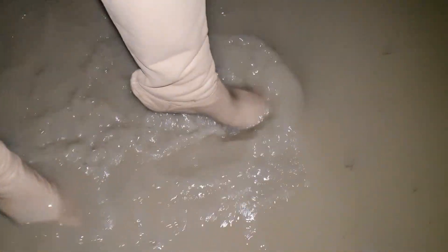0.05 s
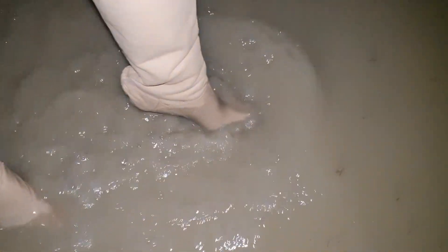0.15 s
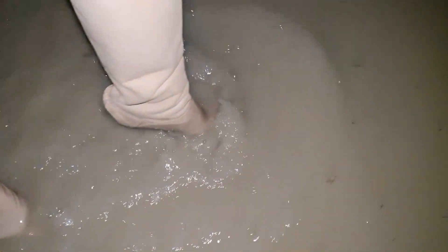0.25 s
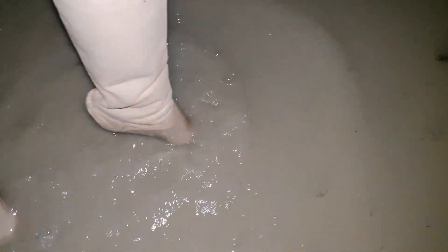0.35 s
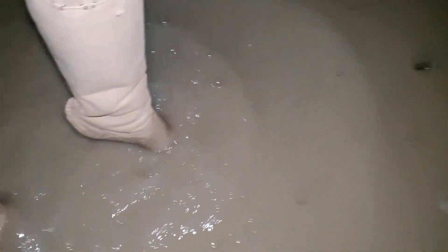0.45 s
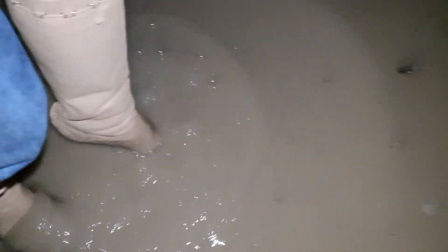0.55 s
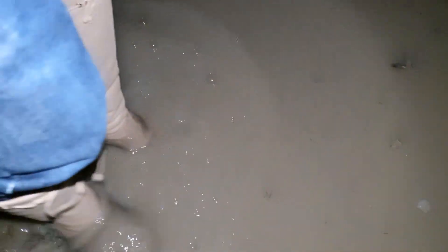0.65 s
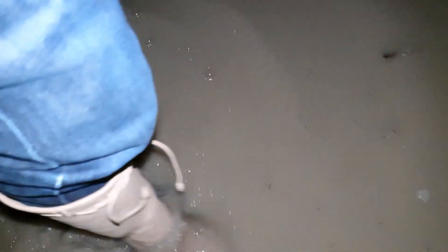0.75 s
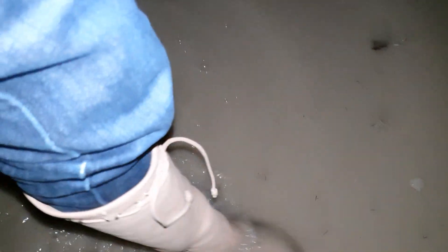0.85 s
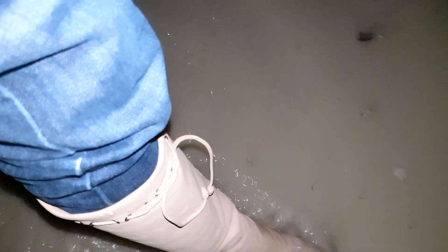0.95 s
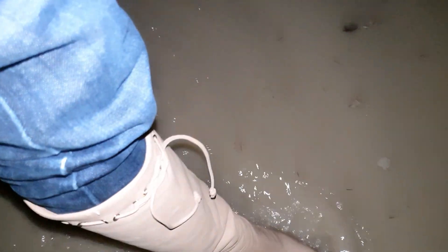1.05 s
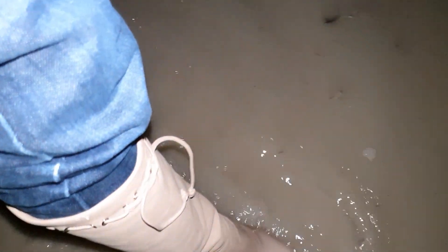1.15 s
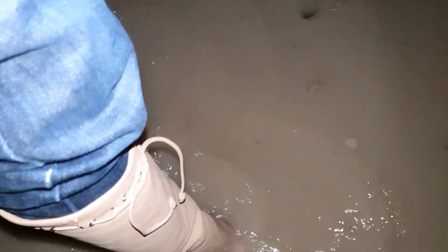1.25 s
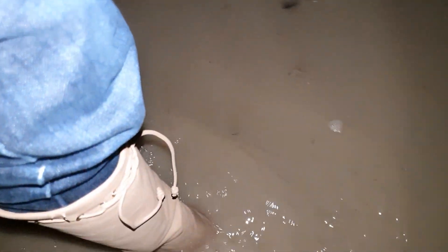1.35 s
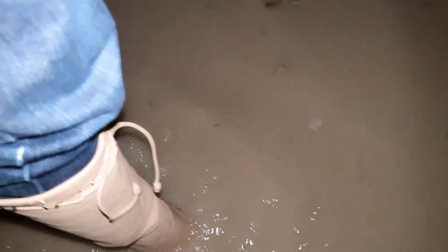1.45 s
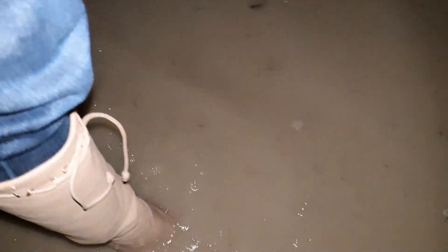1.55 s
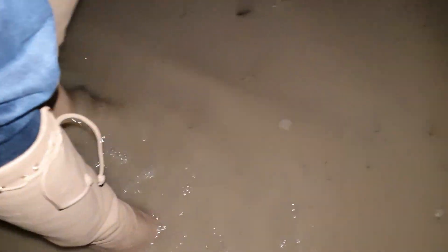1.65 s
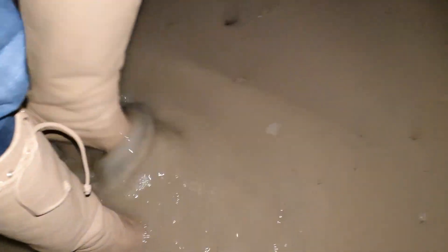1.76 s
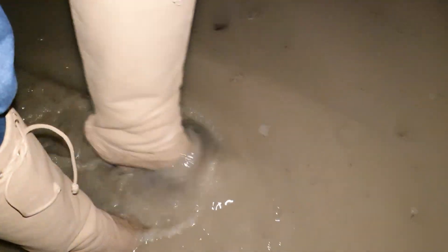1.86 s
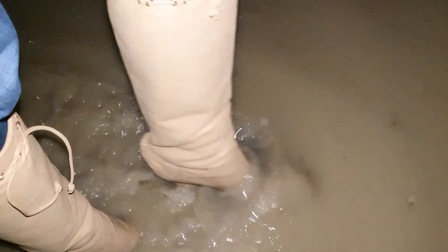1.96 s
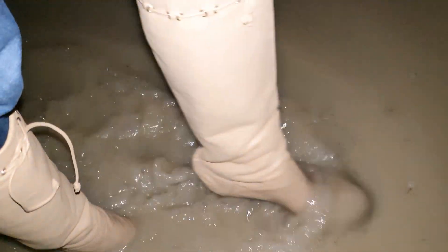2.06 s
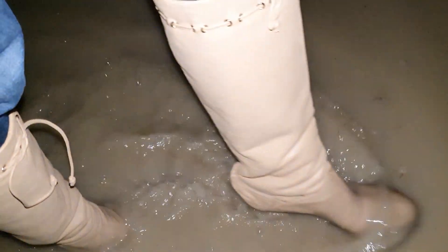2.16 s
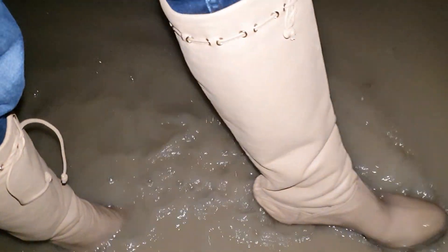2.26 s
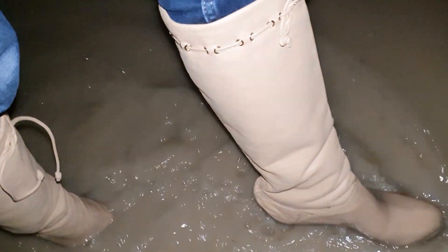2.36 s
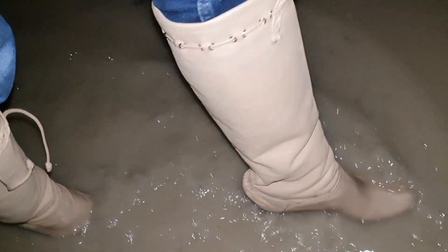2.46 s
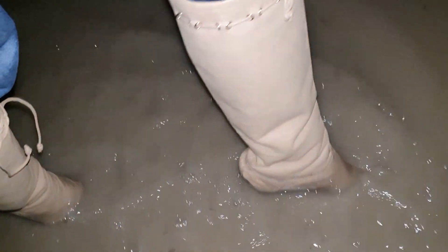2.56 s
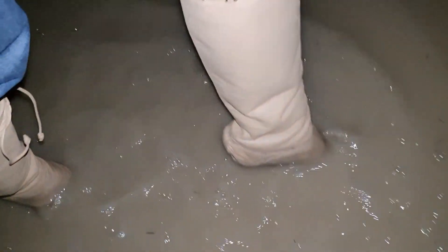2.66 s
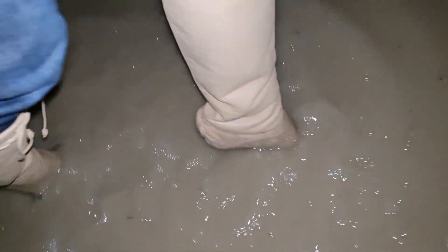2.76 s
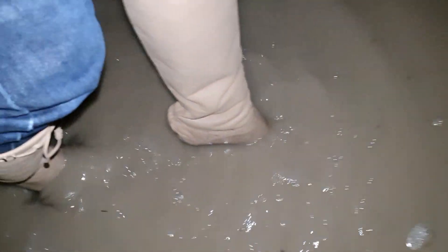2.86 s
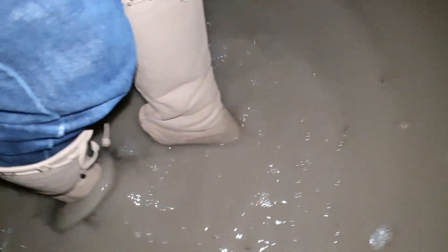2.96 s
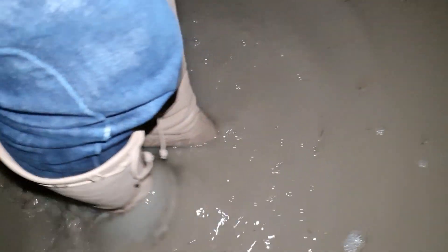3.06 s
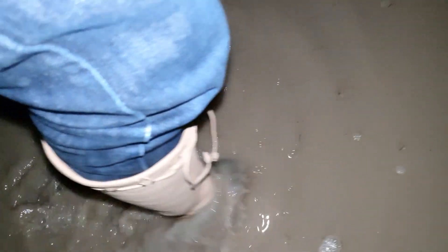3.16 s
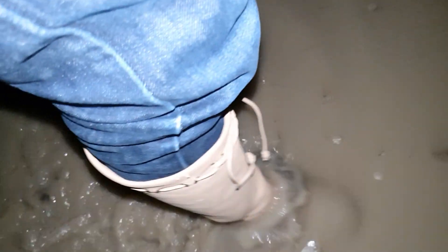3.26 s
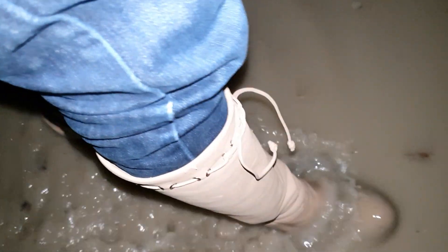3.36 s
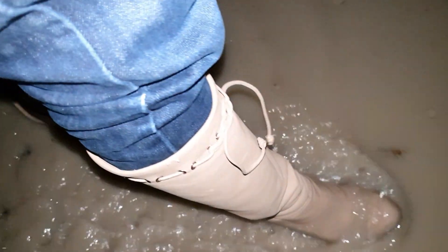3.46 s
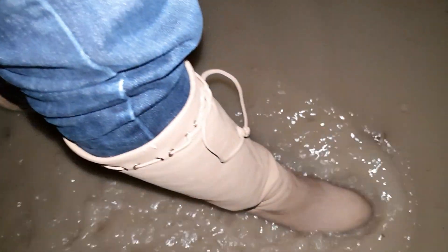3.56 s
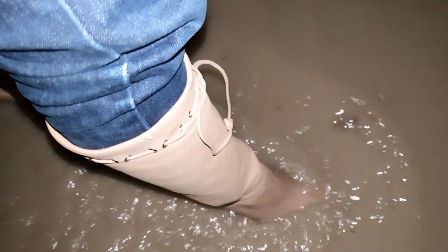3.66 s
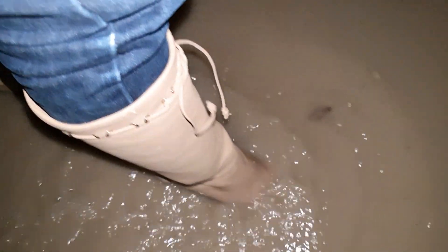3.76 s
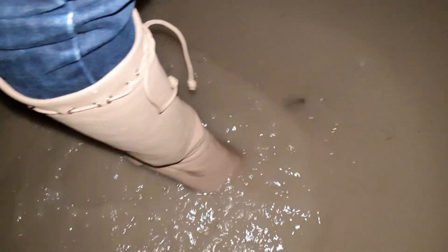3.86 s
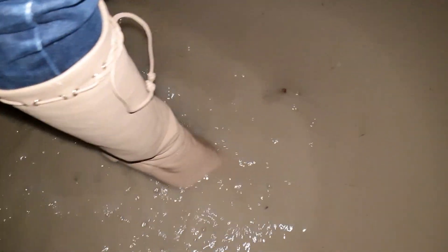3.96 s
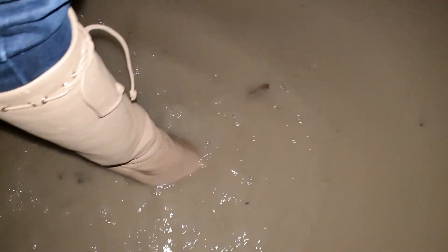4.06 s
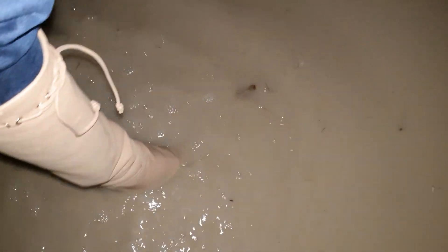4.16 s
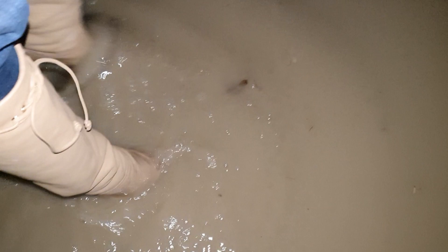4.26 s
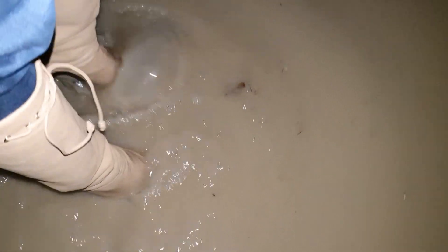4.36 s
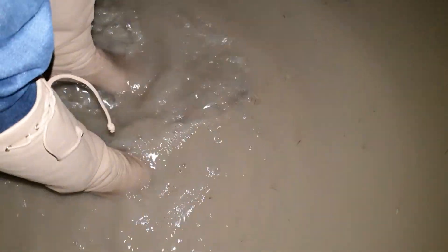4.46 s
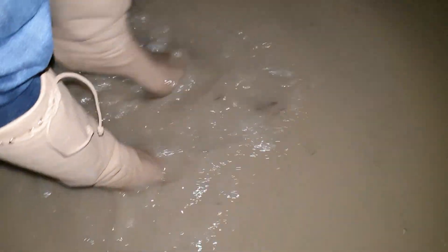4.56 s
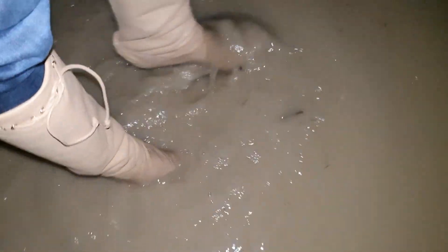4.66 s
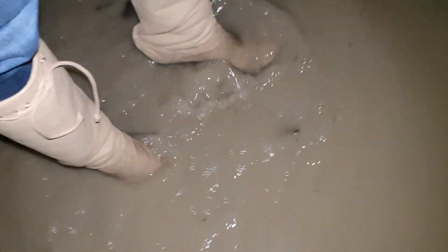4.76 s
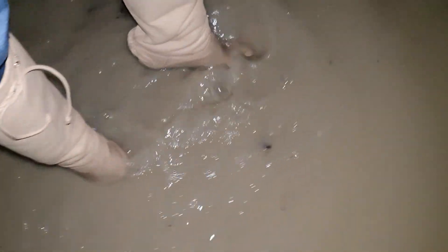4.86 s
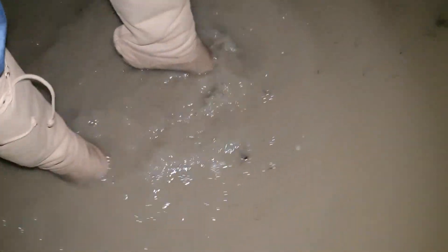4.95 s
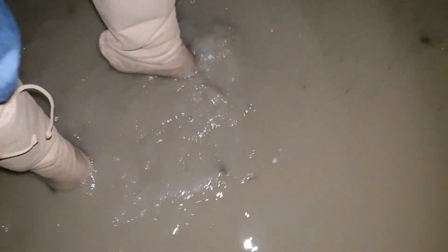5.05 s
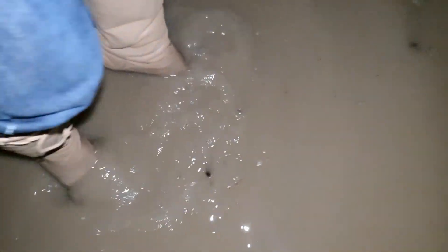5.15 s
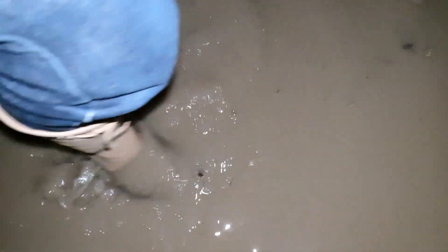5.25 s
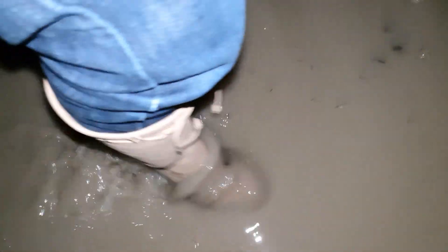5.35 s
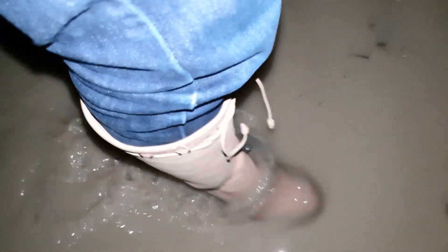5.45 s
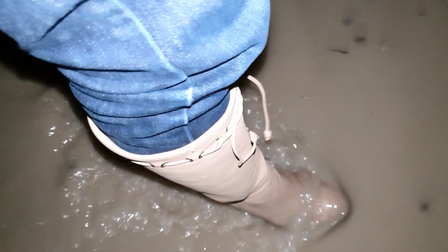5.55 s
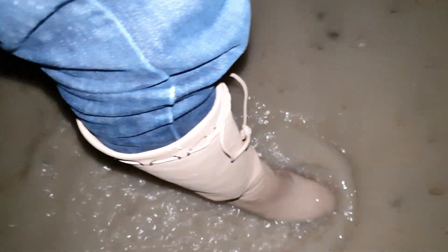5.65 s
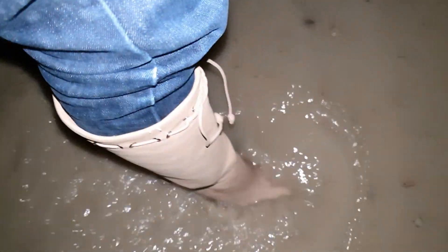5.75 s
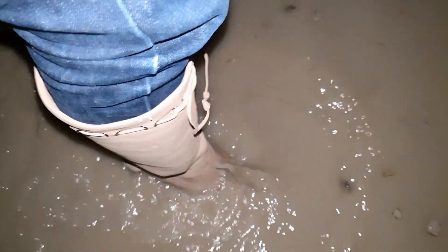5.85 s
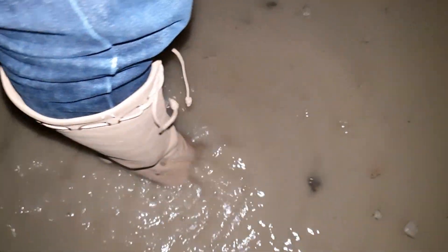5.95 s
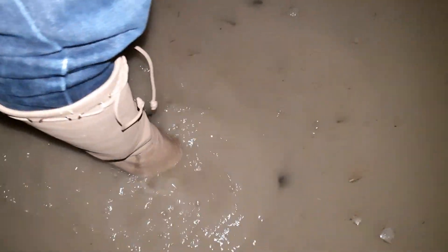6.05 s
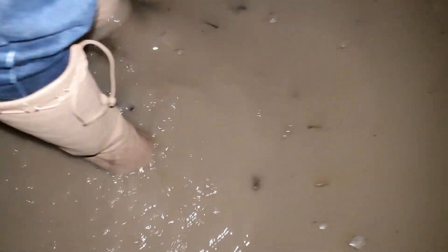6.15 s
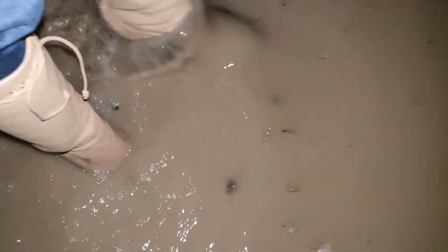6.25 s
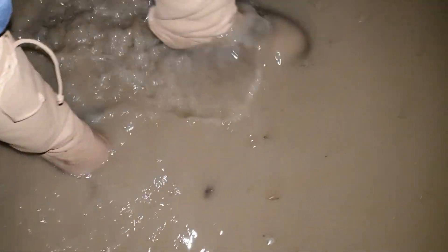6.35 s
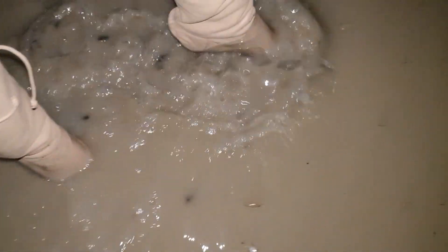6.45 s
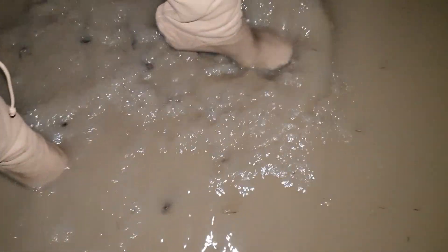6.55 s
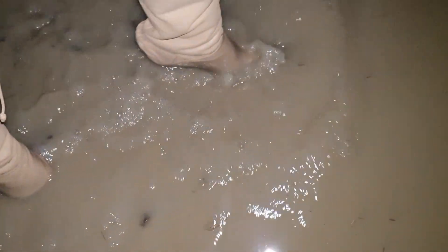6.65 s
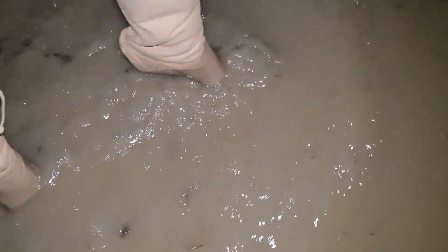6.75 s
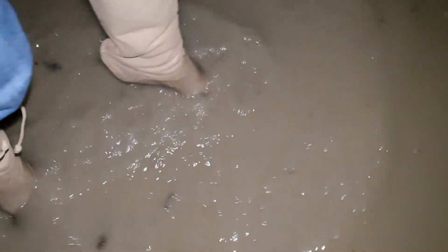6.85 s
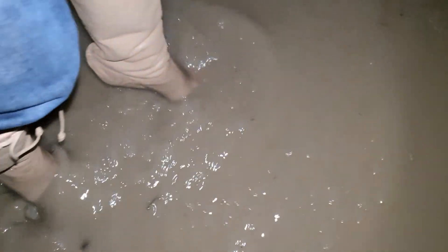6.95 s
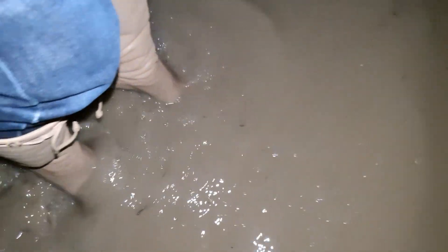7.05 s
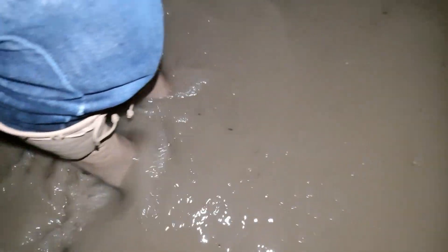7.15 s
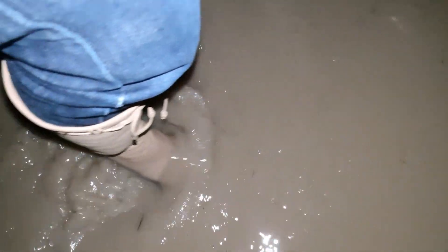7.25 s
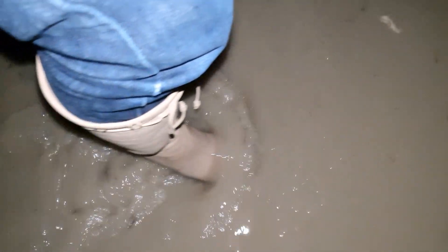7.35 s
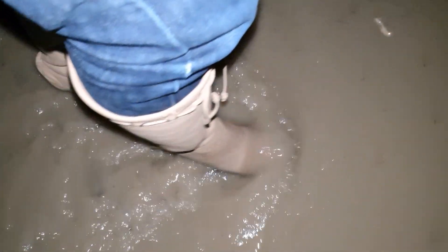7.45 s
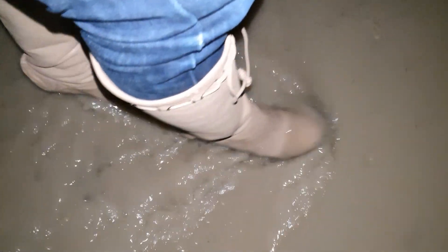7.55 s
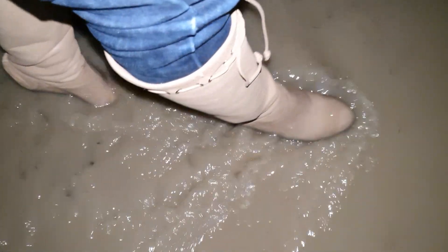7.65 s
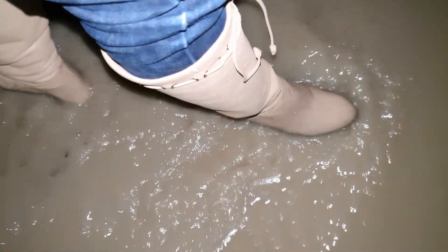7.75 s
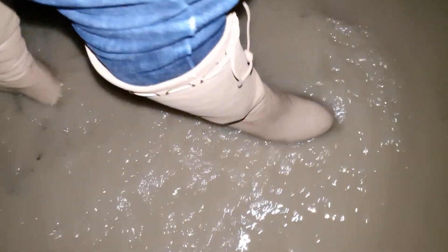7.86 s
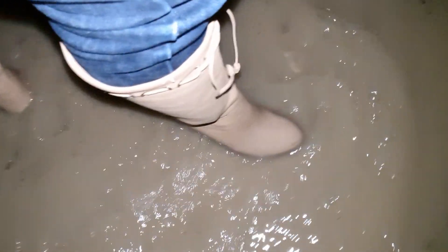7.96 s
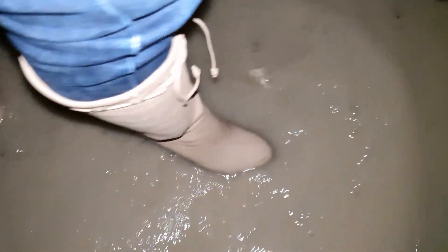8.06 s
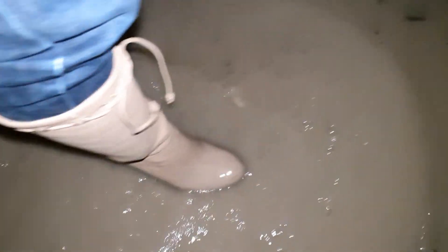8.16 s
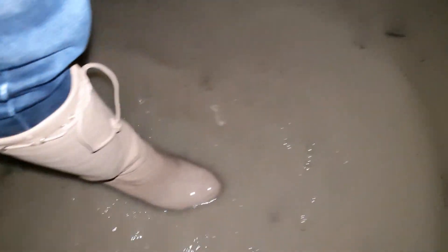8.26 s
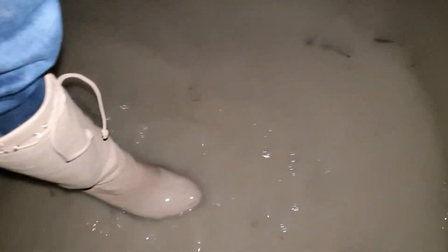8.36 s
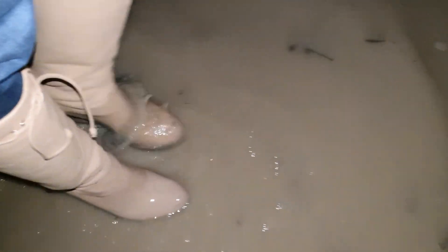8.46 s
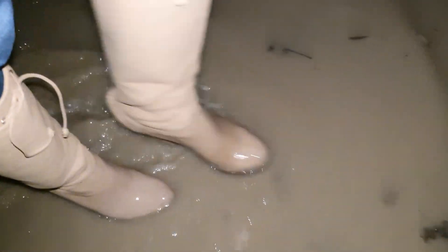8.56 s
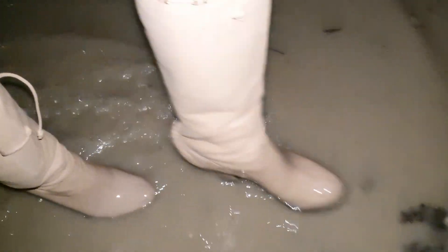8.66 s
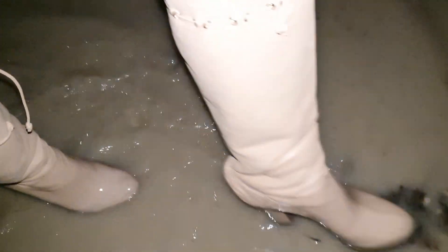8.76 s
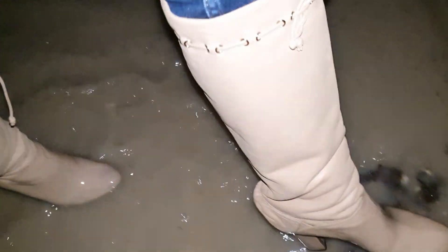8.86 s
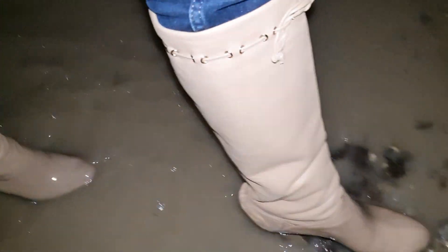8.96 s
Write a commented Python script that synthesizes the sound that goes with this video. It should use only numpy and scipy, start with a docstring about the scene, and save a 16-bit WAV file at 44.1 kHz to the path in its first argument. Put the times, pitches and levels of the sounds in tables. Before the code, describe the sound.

Boots wade through shallow muddy water, close and in stereo, outdoors. A brief splash opens, then a dull double thud at 0.4 s. A full bubbling slosh swells from 0.6 to 1.1 s with a sharp plop near 0.9, followed by small gurgles. Another softer surge peaks at 2 s and trickles off. At 3 to 3.5 s a long, rich churn rings with bubbles and spray. After a lull, a firm wet heel knock lands at 4.3 s, with a smaller thud and slosh at 4.7 to 5. Bright splashing fills 5.3 to 5.7 s, a thud follows at 5.8, and a strong gurgling surge bursts at 6.2 to 6.5. From 7 s the steps are gentle, with light swishes, a low plop at 7.8 and trickles near 8.5, ending on a soft thud at 9 s. Faint low distant rumble and hiss continue throughout.

```python
"""Heeled boots wade slowly through a shallow muddy puddle.
Each stride churns up a swarm of ringing bubbles, ticking spray and a fine noise fizz, in surges that swell and fall.
Single air pockets ring with gliding pitch, heels and soles thud into the mud, and droplets tick one by one.
Shaped noise makes a distant low rumble, steady air and microphone hiss underneath."""
import sys
import numpy as np
from scipy import signal
from scipy.fft import rfft, irfft, next_fast_len
from scipy.io import wavfile
from scipy.ndimage import uniform_filter1d

SR = 44100
rng = np.random.default_rng(int(sys.argv[2]) if len(sys.argv) > 2 else 0)


def put_to_file(sound):
    """Save the sound as 16-bit audio at rate SR, in the file named by the first command-line argument."""
    columns = np.atleast_2d(sound).T  # one column per channel
    safe = np.clip(columns, -1, 1)
    whole_steps = np.round(safe * 32767)
    wavfile.write(sys.argv[1], SR, whole_steps.astype(np.int16))


N = 397341  # length in samples

PORTS = np.array([[.5], [-.5]])  # left and right microphone port take half of each difference
PORT_S, PORT_DB = .0001, 4.5  # spread of arrival time (s) and level (dB) between the ports
LEAD = 20  # samples of room before an onset, for the port that hears it first


def gain_of(db):
    """Decibels to linear gain."""
    return 10 ** (np.asarray(db) / 20)


def evened(x):
    """Scale to an overall RMS of one."""
    return x / np.sqrt(np.mean(x ** 2) + 1e-20)


def read(points, hz):
    """Read a spectrum curve in dB, straight between its points on a log frequency axis."""
    f, value = np.transpose(points)
    return np.interp(np.log(hz + 1), np.log(f + 1), value)


def curve(points):
    """Draw a level curve over the whole scene from (time, value) points."""
    s, value = np.transpose(points)
    return np.interp(np.arange(N) / SR, s, value)


def coloured(x, db_of):
    """Filter by a spectrum given as a function from Hz to dB."""
    size = next_fast_len(N + 4096)
    gain = gain_of(db_of(np.fft.rfftfreq(size, 1 / SR)))
    return irfft(rfft(x, size) * gain, size)[..., :N]


def add(mix, s, sound):
    """Lay a sound into the mix, starting LEAD samples ahead of s."""
    part = mix[:, max(round(s * SR) - LEAD, 0):][:, :sound.shape[1]]
    part += sound[:, :part.shape[1]]


def churn():
    """The boot drags air under: a crowd of bubbles, and spray of brief ticks over a fine fizz."""
    # bubble spectrum: pitch_hz, level_db
    bubble_sizes = [(280, -14.5), (450, 1.5), (800, 6), (1500, 6), (2500, 0), (4500, -11.5)]
    # spray spectrum: pitch_hz, level_db
    spray_sizes = [(1600, -3.5), (3200, 0.5), (6000, -4), (10000, -1.5), (15000, -1)]
    # slops of water share their timing
    slops = evened(uniform_filter1d(uniform_filter1d(rng.standard_normal(N), 400), 300))
    (bubbling_db, spray_db), (bubble_lean, spray_lean) = stirring()

    # gentle stirring leaves fewer plops, a stride a tangle
    per_s = 1100 * gain_of(.15 * (bubbling_db + 40.5))
    bubbles = swarm(bubble_sizes, per_s, spread_db=3.08, few=3.72, many=19.0, rise=0.222,
                    surge_db=3.28 * slops, lean=bubble_lean, count=64)
    spray = swarm(spray_sizes, 3400, spread_db=3.96, few=1.02, many=16.2, rise=0.22,
                  surge_db=2.67 * slops, lean=spray_lean, count=44)

    fizz_sizes = [(400, -19)] + spray_sizes
    fizz = evened(coloured(rng.standard_normal((2, N)), lambda hz: read(fizz_sizes, hz)))
    dull = signal.lfilter(*signal.butter(2, 7500, fs=SR), fizz)
    bright = fizz - dull
    # a lean to fine spray brightens the fizz
    fizz = dull * gain_of(-.4 * spray_lean) + bright * gain_of(1.4 * spray_lean)
    fizz = fizz * gain_of(2.5 * slops - 5.5)
    return gain_of(bubbling_db) * bubbles + gain_of(spray_db) * (spray + fizz)


def stirring():
    """Level in dB and lean of bubbling and spray: every surge swells to its crest and falls away."""
    # surges of water pushed by a boot: start_s, crest_s, end_s, bubbling_db, spray_db,
    # lean to small bubbles (dB per octave), lean to fine spray (dB per octave)
    surges = [(0, 0.035, 0.099, -44, -46, -2, -5), (0.028, 0.217, 0.44, -55, -65.5, -2.5, -1),
              (0.563, 0.874, 1.084, -39, -47, 0.8, -1), (0.964, 1.05, 1.163, -42.5, -53, -6, -5),
              (1.084, 1.267, 1.455, -55, -67, -0.5, 0.5), (1.51, 1.717, 1.88, -56, -73, 1, 1),
              (1.718, 1.812, 1.9, -51.5, -55, 2, -1), (1.714, 2.01, 2.267, -44, -51.5, 0, -2),
              (2.113, 2.336, 2.53, -49, -66.5, -1, 3), (2.495, 2.756, 2.84, -61.5, -62.5, -0.3, 8.5),
              (2.955, 3.074, 3.26, -39, -54, -2.5, .3), (2.976, 3.244, 3.56, -39.5, -45.5, -1.5, -2),
              (3.33, 3.45, 3.68, -49, -56.5, 3.5, 5), (3.57, 3.694, 3.854, -63.5, -70, -5, 5),
              (4.208, 4.244, 4.29, -46, -57, -7, 3), (4.236, 4.406, 4.57, -44, -52.5, -5, 0.2),
              (4.646, 4.659, 4.83, -49.5, -49.5, 1.5, -7), (4.71, 4.912, 5.04, -47, -56.5, -4, -2.5),
              (5.183, 5.26, 5.3, -58.5, -64, 4, -2.5), (5.257, 5.368, 5.45, -41.5, -48.5, 7.5, -0.5),
              (5.333, 5.532, 5.69, -39, -48, 3, 0.5), (5.649, 5.808, 5.94, -55, -63, -0.5, 3.5),
              (5.936, 6.126, 6.16, -55.5, -71.5, 2.5, 3), (6.123, 6.255, 6.66, -38.5, -47.5, 1, -2),
              (6.364, 6.46, 6.62, -44.5, -47.5, 1, -1.8), (6.54, 6.624, 6.79, -61, -66, 0.5, 3),
              (6.91, 7.168, 7.54, -53, -61, 1.5, 0.5), (7.436, 7.6, 7.78, -54.5, -64, 2.5, 2),
              (7.65, 7.77, 8.01, -55.5, -65, -2, -1), (7.872, 8.227, 8.25, -63.5, -77.5, -5.5, 3),
              (8.284, 8.471, 8.66, -49.5, -59.5, -1.3, 0), (8.46, 8.606, 8.78, -54.5, -53.5, 11, -2),
              (8.965, 9.001, 9.24, -48.5, -53.5, 0, -1)]
    # rows of the next four: bubbling, spray
    # level at the ends of a surge, against its crest: edge_db
    edge_db = [
        [-29.5],
        [-22.5],
    ]
    # level of the water between surges: calm_db
    calm_db = [
        [-78.5],
        [-75],
    ]
    # shape of the swell, higher holds the crest longer: exponent (no unit)
    flatness = [
        [2.44],
        [2.24],
    ]
    # lean gained from crest to end, so the large pockets sound first: drift (dB per octave)
    lean_drift = [
        [1.5],
        [0.38],
    ]
    t = np.arange(N) / SR
    power = gain_of(calm_db) ** 2 * np.ones(N)
    lean = np.zeros((2, N))
    for start, crest, end, *both in surges:
        part = slice(int(start * SR), int(end * SR))
        phase = np.interp(t[part], [start, crest, end], [-1, 0, 1])
        own_db = np.c_[both[:2]] + edge_db * abs(phase) ** flatness
        own_power = gain_of(own_db) ** 2
        power[:, part] += own_power
        lean[:, part] += own_power * (np.c_[both[2:]] + lean_drift * phase)
    return 10 * np.log10(power), lean / power  # overlapping surges share the lean by power


def swarm(sizes, per_s, spread_db, few, many, rise, surge_db, lean, count):
    """Many random pockets of all sizes, louder and softer in clumps; each rings few to many cycles."""
    out = np.zeros((2, N))
    pitches = np.geomspace(sizes[0][0], sizes[-1][0], count)
    for hz in pitches:
        luck = rng.random(2)
        cycles = few * (many / few) ** luck[0]
        shape = pocket(hz, cycles, rise * (luck[1] - .3), rng.standard_normal(2))
        shape = shape / np.linalg.norm(shape)
        odds = rng.random(N) / (per_s / count / SR)
        at = odds < 1  # the samples where a pocket sets off
        own_db = spread_db * np.minimum(-np.log(odds[at] + 1e-9), 4)  # a few are large
        lean_db = lean[at] * np.log2(hz / np.median(pitches))
        strikes = np.zeros(N)
        strikes[at] = gain_of(own_db + surge_db[at] + lean_db)
        out += gain_of(read(sizes, hz)) * signal.oaconvolve(strikes[None], shape, axes=1)[:, :N]
    # level out the slow loudness over about 0.2 s, so that the surges alone set it
    slow_power = signal.oaconvolve(out.mean(0) ** 2, np.hanning(9000) / 4500, "same")
    return out / np.sqrt(slow_power + 1e-4)


def pocket(hz, cycles, rise, side):
    """A damped, ringing air pocket whose pitch glides as it nears the surface, heard at two ports."""
    swell = 0.2  # pockets that ring longer also swell more softly
    life = max(cycles, .3) / hz  # seconds to fall to about a third
    t = np.arange(int(5 * life * SR) + 2 * LEAD) / SR
    t = np.maximum(t - LEAD / SR - PORT_S * side[0] * PORTS, 0)
    glide = np.minimum(t, 3 * life)  # the pitch settles after three lives
    turns = hz * (t + rise * glide * (t - glide / 2) / life)
    turns = np.minimum(turns, .45 * SR * t)  # guard against aliasing
    onset = 1 - np.exp(-4 * hz * t / (1 + swell * cycles))
    decay = np.exp(-t / life - (t / life / 3) ** 2)
    ring = onset * decay * np.sin(2 * np.pi * turns)
    # low pockets differ less in level between the ports
    return ring * gain_of(PORT_DB * min(hz / 900, 1) * side[1] * PORTS)


def lone_pockets():
    """Air pockets that stand out one by one, each a gliding, damped ring."""
    # air pockets: start_s, pitch_hz, level_db, cycles to fall to a third,
    # pitch glide (share of the pitch over those cycles)
    pocket_table = [(0.051, 2280, -22.5, 2.3, 0.082), (0.096, 572, -40.5, 9.5, 0.15),
                    (0.176, 1036, -37, 13.5, 0.18), (0.598, 1360, -26, 2.7, 0.04),
                    (0.639, 1730, -34, 4.8, 0), (0.705, 587, -26.5, 5.1, 0.049),
                    (0.743, 2260, -24, 2.6, -0.0063), (0.901, 309, -33.5, 4.9, 0.31),
                    (0.908, 2050, -12.5, 2.9, -0.023), (0.915, 736, -27.5, 5.6, 0.061),
                    (0.937, 1290, -22.5, 5.5, -0.05), (1.052, 1940, -26, 6.1, 0.2), (1.15, 3800, -35, 1, 0),
                    (1.156, 900, -31.5, 1.2, 0), (1.157, 4000, -27, 1.1, -0.046),
                    (1.278, 2500, -31, 1.6, -0.039), (1.288, 530, -21, 1.11, -0.2),
                    (1.288, 3720, -27.5, 3.2, -0.03), (1.845, 1296, -33.5, 18, -0.031),
                    (1.902, 1160, -32, 12, 0.16), (1.925, 720, -33.5, 9, -0.2),
                    (1.946, 362, -33.5, 4.2, 0.064), (2.011, 790, -32.5, 3.8, 0.005),
                    (2.016, 1490, -25, 4.8, -0.21), (2.031, 1530, -23, 4.1, 0.03),
                    (2.196, 1350, -38.5, 10.3, 0.02), (2.296, 398, -43.5, 11, 0.0081),
                    (2.303, 800, -40.5, 13, 0.2), (2.329, 3350, -23, 7, -0.01),
                    (2.398, 560, -36.5, 7.1, 0.0061), (2.452, 546, -33, 6.2, 0.16),
                    (3.044, 1510, -27.5, 24, 0.089), (3.085, 480, -23, 1.4, 0),
                    (3.102, 370, -25.5, 2.6, 0.0079), (3.149, 1080, -29, 20, 0.022),
                    (3.207, 780, -30.5, 18, 0.37), (3.214, 610, -28, 5.8, -0.092),
                    (3.283, 830, -30, 12, -0.12), (3.301, 607, -24.5, 3.0, 0.2),
                    (3.344, 1480, -25, 10.5, -0.044), (3.351, 804, -26, 5.5, -0.21),
                    (3.367, 2800, -21, 3.7, -0.0088), (3.437, 1490, -31, 14, -0.039),
                    (3.574, 1490, -36, 4.8, 0.021), (3.596, 2070, -42, 15, 0.03),
                    (3.656, 1020, -56, 13.4, 0.23), (4.251, 590, -30, 2.2, -0.23),
                    (4.293, 500, -27, 2.0, 0.14), (4.328, 470, -27, 3, -0.019),
                    (4.328, 1210, -23.5, 2.1, -0.075), (4.368, 1080, -33, 7.7, -0.046),
                    (4.438, 1660, -32, 14, 0.046), (4.657, 3500, -32, 5.1, 0.0081),
                    (4.694, 5400, -25, 3.3, 0.0021), (4.718, 1730, -27.5, 4.1, -0.08),
                    (4.887, 1110, -32, 4.22, -0.03), (4.962, 2340, -30, 2.4, 0.061),
                    (5.193, 500, -38, 1.4, 0), (5.24, 760, -31, 2.5, 0), (5.302, 1110, -17.5, 1.1, -0.046),
                    (5.351, 890, -30, 15.3, -0.19), (5.412, 755, -32.5, 25, 0.23),
                    (5.423, 3750, -27, 6.6, -0.081), (5.489, 1340, -24, 5, 0.1),
                    (5.525, 535, -24, 2.2, -0.18), (5.554, 1320, -28.5, 9.1, -0.06),
                    (5.57, 2300, -18.5, 1.3, 0.22), (5.609, 990, -28.5, 7, -0.19),
                    (5.803, 1100, -33, 2.1, -0.12), (5.911, 1380, -35.5, 3, -0.072),
                    (6.074, 636, -29.5, 0.93, -0.061), (6.161, 725, -33, 9.8, 0.22),
                    (6.206, 1050, -20.5, 3.4, 0.05), (6.238, 1290, -18.5, 3.5, 0.082),
                    (6.264, 760, -27, 5.1, 0.2), (6.278, 1370, -27, 7.8, 0.041),
                    (6.282, 710, -28.5, 6.1, -0.16), (6.304, 1074, -25, 6.4, 0.054),
                    (6.315, 680, -22.5, 3.1, 0.13), (6.333, 610, -26, 6.5, 0.21),
                    (6.518, 810, -28, 3.2, 0.11), (6.682, 533, -45.5, 4.8, 0.3),
                    (7.005, 780, -33, 2.3, 0.12), (7.005, 4670, -28, 4.05, 0.34),
                    (7.083, 1150, -39.5, 9.7, 0.36), (7.176, 1330, -36, 10.8, -0.04),
                    (7.245, 745, -48.5, 14, -0.083), (7.309, 600, -47.5, 9.2, -0.059),
                    (7.53, 586, -35, 3.5, -0.045), (7.554, 670, -38, 3.5, -0.09),
                    (7.603, 1250, -36, 4.2, -0.064), (7.672, 1300, -47, 18, 0.024),
                    (7.736, 2800, -41, 8.2, -0.041), (7.775, 680, -34.5, 5.8, -0.033),
                    (7.803, 560, -18.5, 1.8, -0.04), (7.844, 1296, -46.5, 18, 0.11),
                    (7.868, 2040, -33, 1.4, 0.045), (8.038, 700, -29.5, 0.85, 0.0044),
                    (8.19, 560, -41, 2.1, 0.073), (8.312, 906, -46.5, 16, 0.33),
                    (8.389, 2660, -43.5, 16, 0.02), (8.42, 1500, -36, 12, 0.12),
                    (8.432, 3450, -37, 15, -0.17), (8.468, 510, -35, 2.7, 0.016),
                    (8.468, 1700, -35, 6.1, 0.04), (8.613, 2540, -37, 7.6, 0.086),
                    (8.766, 4270, -39, 10, 0.16)]
    out = np.zeros((2, N))
    sides = rng.standard_normal((len(pocket_table), 2))
    for (s, hz, db, cycles, rise), side in zip(pocket_table, sides):
        add(out, s, gain_of(db) * pocket(hz, cycles, rise, 0.58 * side))
    return out


def heel_thuds():
    """Heel and sole meet the mud: a crack and wet leather smack, then a low, heavily damped blow."""
    # footfalls: start_s, blow level_db, blow pitch_hz, crack level_db
    thud_table = [(.355, -20.5, 398, -27), (.364, -17.5, 410, -41.5), (.367, -22.5, 324, -31),
                  (2.455, -32, 149, -30.5), (2.756, -33.5, 314, -31.5), (4.228, -26, 135, -35),
                  (4.255, -28, 90, -50), (4.278, -16, 178, -17), (4.32, -22, 303, -19),
                  (4.663, -28, 203, -49), (4.677, -23, 252, -53), (4.689, -29, 170.7, -50),
                  (4.747, -27, 170, -44), (5.758, -25.5, 222, -60), (5.787, -24, 260, -36),
                  (5.79, -16, 252, -24), (5.839, -22.5, 203, -29), (6.497, -29.5, 196, -28),
                  (8.986, -22, 287, -33)]
    out, centre = np.zeros((2, N)), (0, 0)
    for s, db, hz, crack_db in thud_table:
        # the sole cracks the surface
        add(out, s, gain_of(crack_db) * pocket(1130, 1.0, -0.049, centre))
        add(out, s, slap(crack_db - 21.5, 0.076))
        # then mud takes the weight and damps the blow
        add(out, s + 0.00237, gain_of(db) * pocket(hz, 0.67, -0.0089, centre))
    return out


def droplets():
    """Droplets land one by one: a small ring, a very short wide tick and a touch of noise."""
    # droplets landing: start_s, level_db
    drop_table = [(0.3137, -38), (0.685, -27), (0.791, -46), (0.807, -29), (0.8598, -31), (0.9366, -27.5),
                  (1.8176, -31), (2.202, -29), (2.2672, -34.5), (2.629, -36), (3.257, -30), (3.3374, -25),
                  (3.4678, -28), (3.5715, -32), (4.464, -33.5), (4.6515, -37), (4.6932, -33),
                  (4.9794, -32.5), (5.3333, -36), (5.352, -32), (5.3745, -31), (5.4084, -34), (5.537, -27),
                  (5.5677, -26.5), (5.6133, -35), (5.7899, -28), (6.2377, -29), (6.313, -26.5),
                  (6.4574, -24), (7.0938, -32), (7.5809, -41), (8.1389, -51), (8.4125, -36)]
    ring_hz, tick_hz = 6450, 11200  # middle of the varied rings, and centre of the tick
    out = np.zeros((2, N))
    for (s, db), (*side, size) in zip(drop_table, rng.standard_normal((len(drop_table), 3))):
        add(out, s, gain_of(db - 2.0) * pocket(ring_hz * (1 + 0.071 * size), 4.8, 0.14, side))
        add(out, s, gain_of(db + 10.5) * pocket(tick_hz, 0.67, 0, side))
        add(out, s, slap(db - 9.0, 0.019))
    return out


def slap(db, t60):
    """A short smack of noise, dull above a few kilohertz, that falls 60 dB in t60 seconds."""
    t = np.arange(2000) / SR
    burst = rng.standard_normal(len(t)) + rng.standard_normal((2, len(t)))  # half shared by the ports
    return gain_of(db - 60 * t / t60) * signal.lfilter([.3], [1, -.7], burst)


def rumble():
    """A low distant roar of noise that swells and fades over steady air, nearly the same at both ports."""
    # slow swell of the roar: time_s, level_db
    roar_swell = [(0, -66), (1.6, -63), (2.3, -60), (3, -63.5), (4, -53.5), (5.1, -58), (6.3, -55),
                  (6.9, -60.5), (7.6, -55.5), (9.01, -57.5)]
    # spectrum of the roar: frequency_hz, level_db per Hz
    roar_colour = [(20, -55), (45, -7.5), (68, -5), (87, -1), (112, -6), (170, -13), (260, -24),
                   (500, -46.5)]
    # spectrum of the steady air: frequency_hz, level_db per Hz
    air_colour = [(60, -3.5), (150, -5.5), (400, -12), (900, -36.5), (2500, -40)]
    air_db = -64.5
    roar, air = rng.standard_normal((2, 1, N)) + 0.38 * rng.standard_normal((2, 2, N))
    lumps_db = 2.0 * evened(uniform_filter1d(uniform_filter1d(rng.standard_normal(N), 5000), 4000))
    roar = evened(coloured(roar, lambda hz: read(roar_colour, hz)))
    air = evened(coloured(air, lambda hz: read(air_colour, hz)))
    return gain_of(curve(roar_swell) + lumps_db) * roar + gain_of(air_db) * air


def scene():
    """Churned water, the single pockets, thuds and droplets, and the rumble beneath."""
    return churn() + lone_pockets() + heel_thuds() + droplets() + rumble()


def record(dry):
    """The camera body shades the left port; capsule hiss, microphone colour and band limit follow."""
    # shading between the ports: frequency_hz, left minus right level_db
    shadow = [(60, -0.5), (400, -3), (1300, -4.5), (2400, -8), (6500, -11.5), (9000, 1), (11500, 0.5),
              (14000, -6.5)]
    # microphone colour: frequency_hz, level_db
    mic_colour = [(22, -31), (45, 5.5), (3000, 2.5), (6800, 4.5), (7450, -4.5), (8800, 3), (11000, -1.5),
                  (15500, -7.5)]
    hiss_db, edge_hz = -77, 15900  # hiss ahead of its filters, and upper band limit
    shaded = coloured(dry, lambda hz: read(shadow, hz) * PORTS)
    hiss = signal.lfilter([1], [1, -.9, .25], rng.standard_normal((2, N)))
    heard = coloured(shaded + gain_of(hiss_db) * hiss, lambda hz: read(mic_colour, hz))
    band_limit = signal.firwin(511, edge_hz, window=("kaiser", 9), fs=SR)
    return signal.oaconvolve(heard, band_limit[None], "same", axes=1)


dry = scene()
out = record(dry)
put_to_file(out)
```